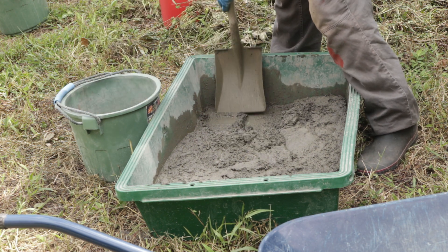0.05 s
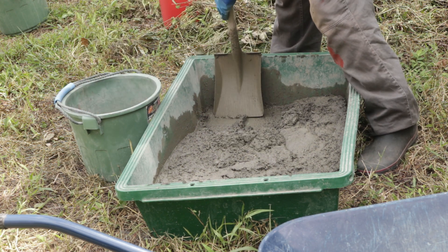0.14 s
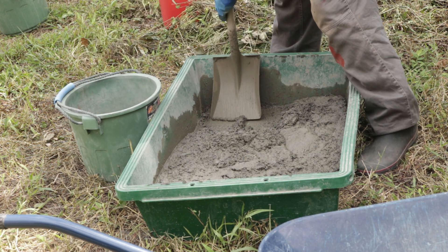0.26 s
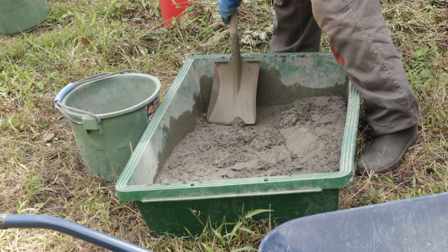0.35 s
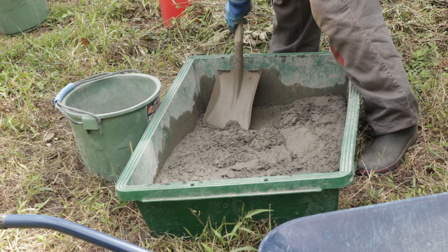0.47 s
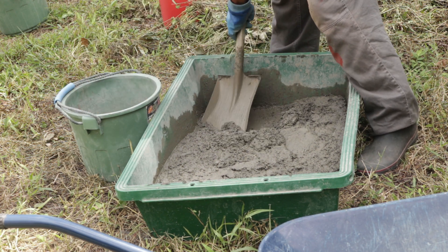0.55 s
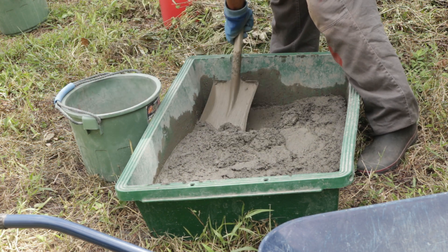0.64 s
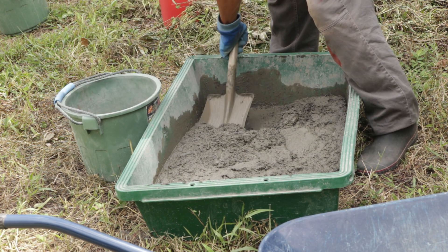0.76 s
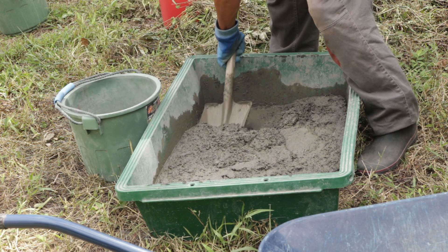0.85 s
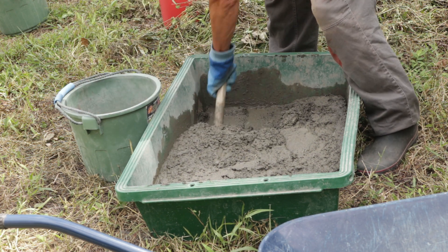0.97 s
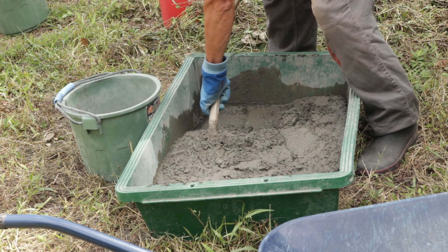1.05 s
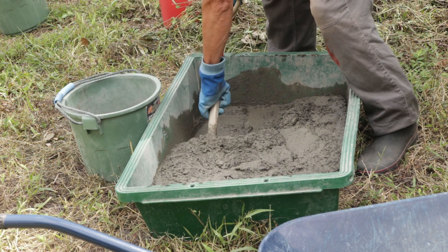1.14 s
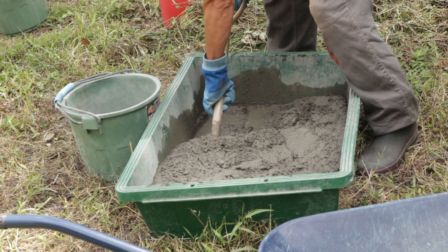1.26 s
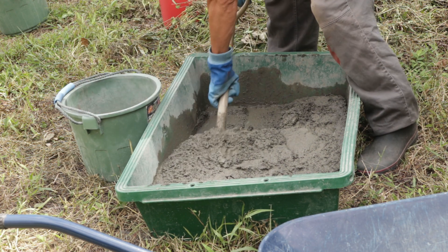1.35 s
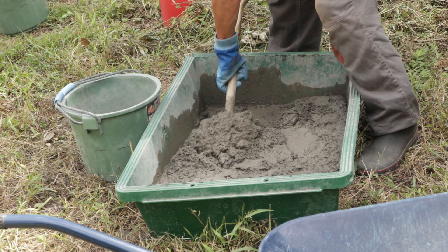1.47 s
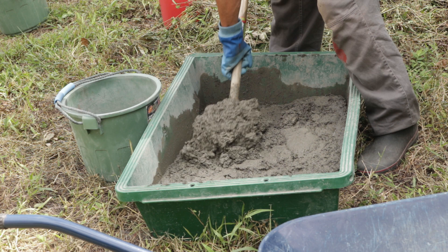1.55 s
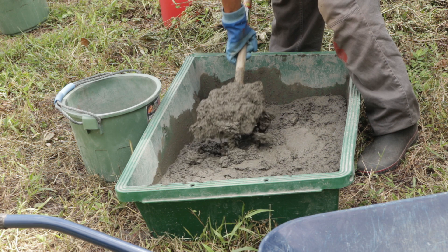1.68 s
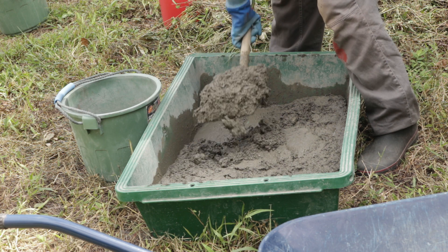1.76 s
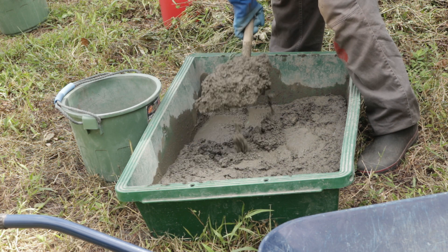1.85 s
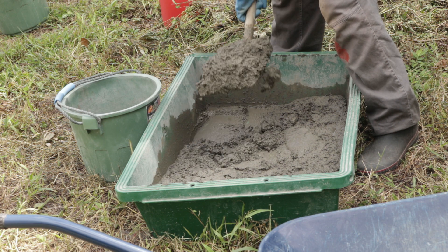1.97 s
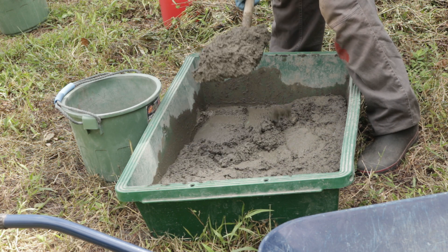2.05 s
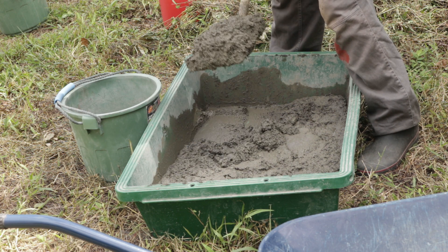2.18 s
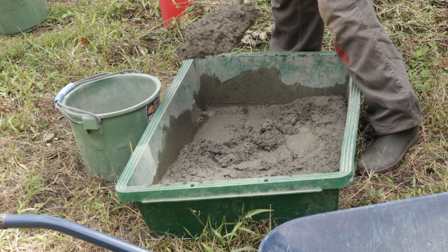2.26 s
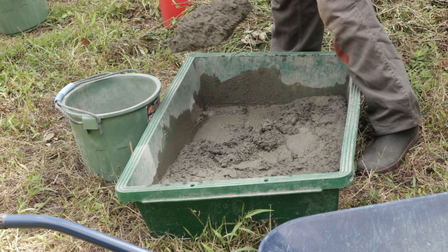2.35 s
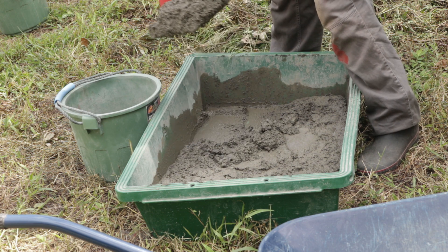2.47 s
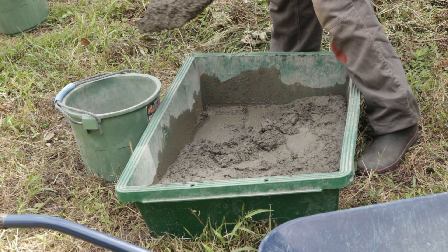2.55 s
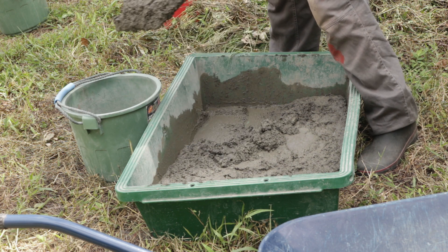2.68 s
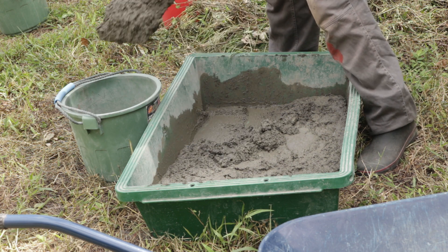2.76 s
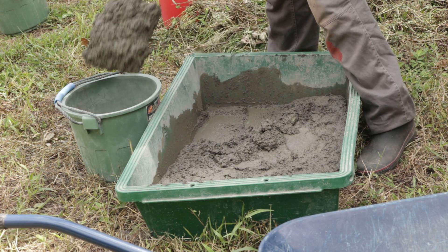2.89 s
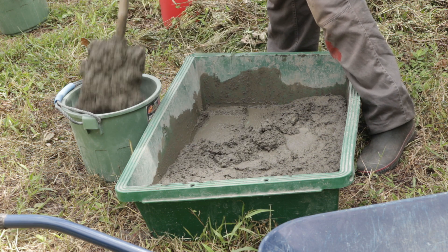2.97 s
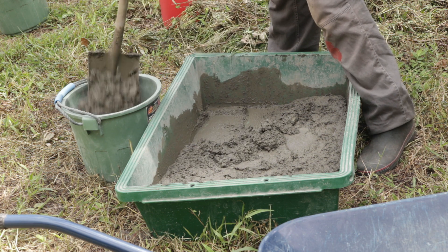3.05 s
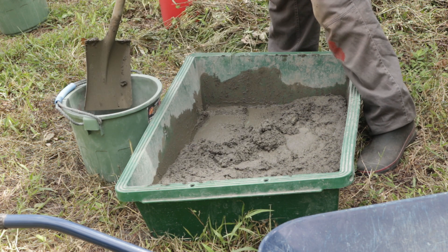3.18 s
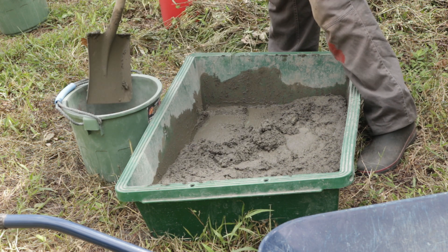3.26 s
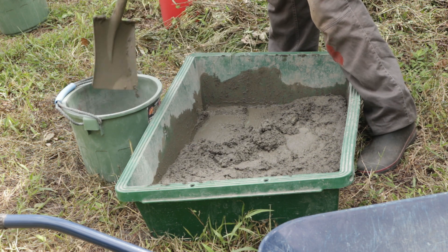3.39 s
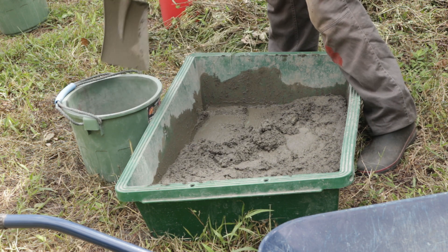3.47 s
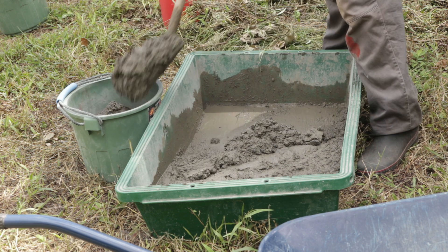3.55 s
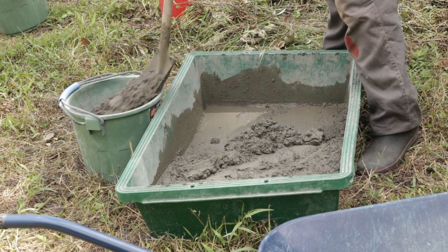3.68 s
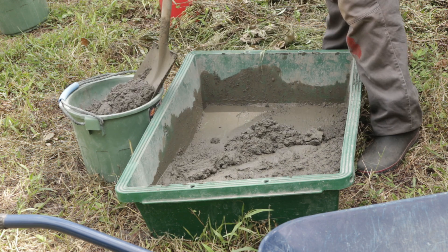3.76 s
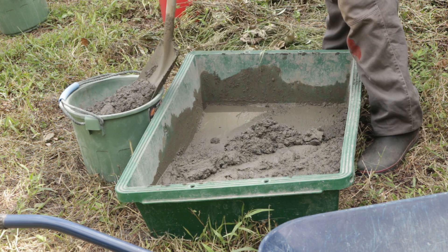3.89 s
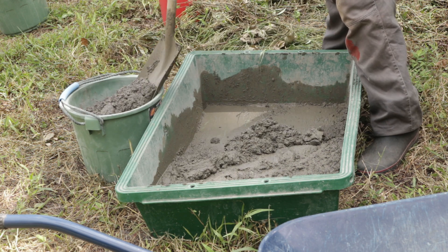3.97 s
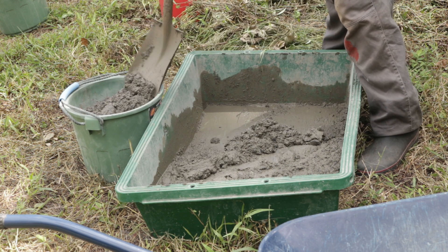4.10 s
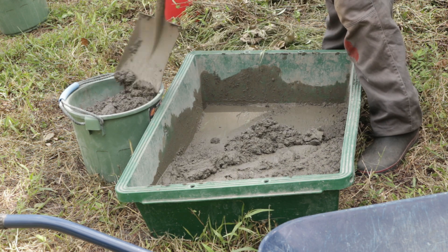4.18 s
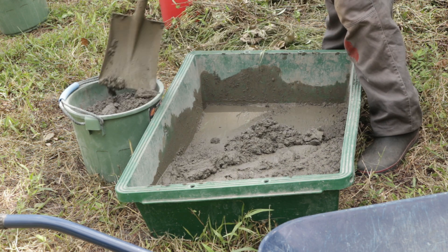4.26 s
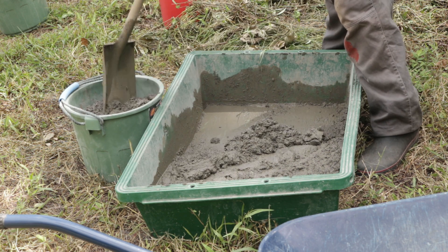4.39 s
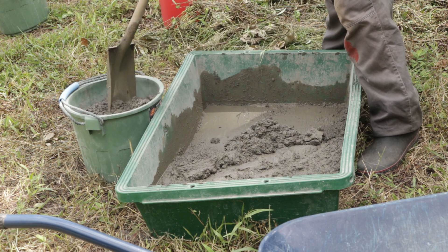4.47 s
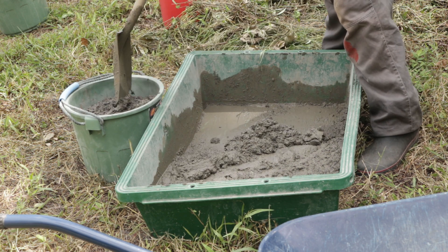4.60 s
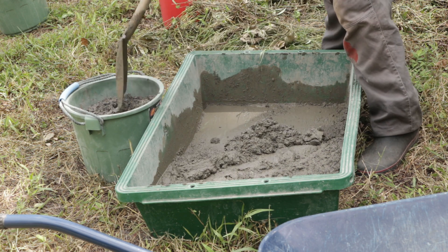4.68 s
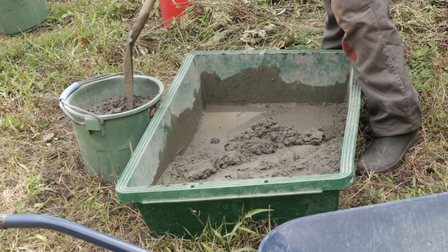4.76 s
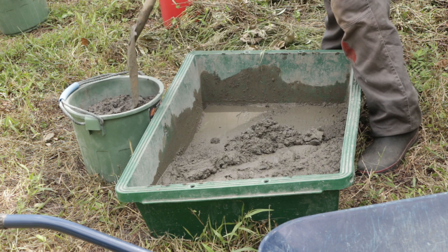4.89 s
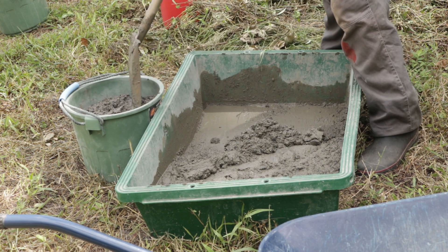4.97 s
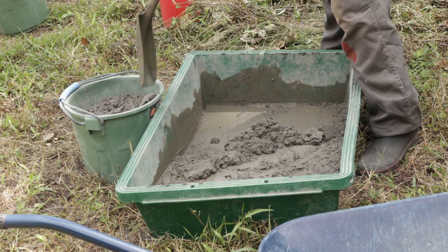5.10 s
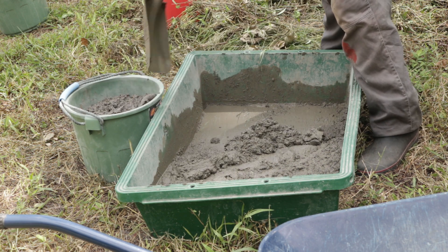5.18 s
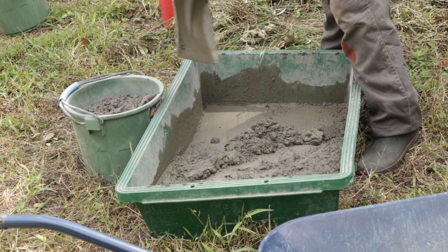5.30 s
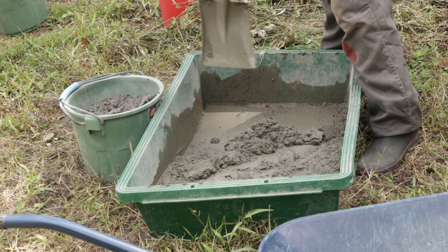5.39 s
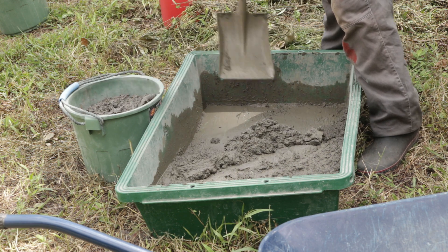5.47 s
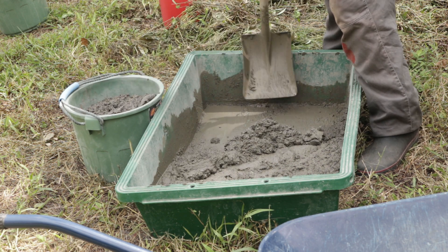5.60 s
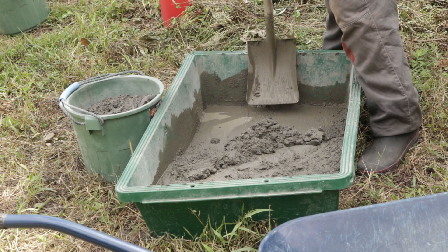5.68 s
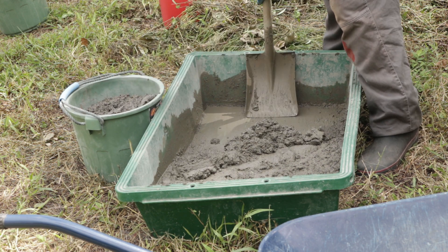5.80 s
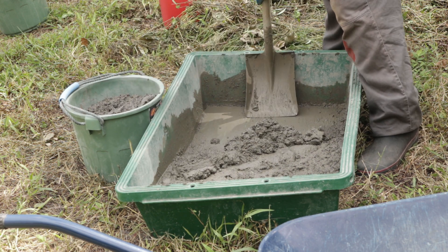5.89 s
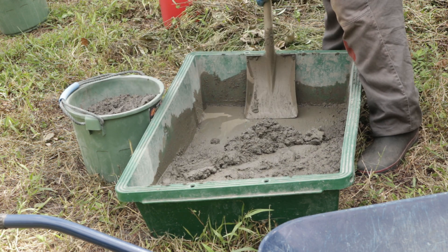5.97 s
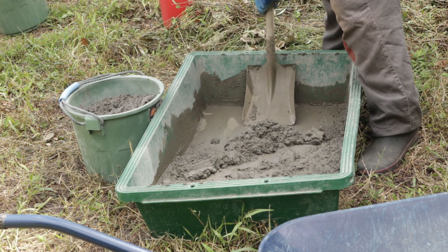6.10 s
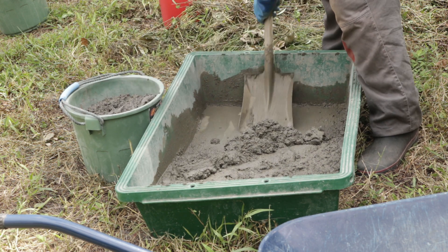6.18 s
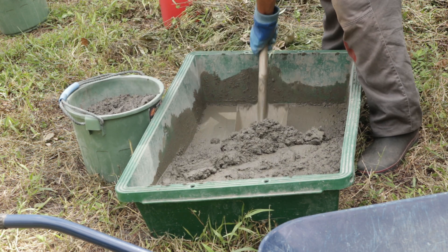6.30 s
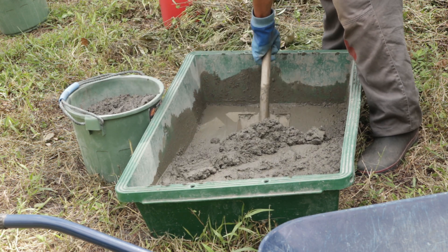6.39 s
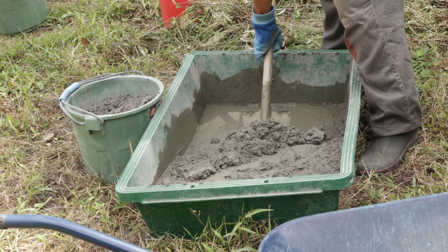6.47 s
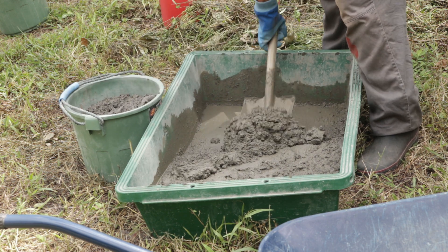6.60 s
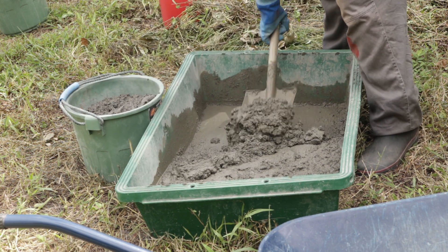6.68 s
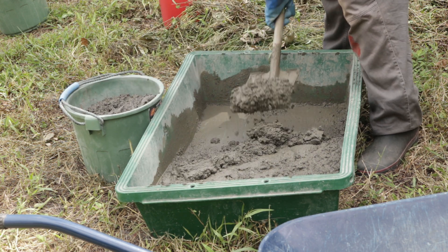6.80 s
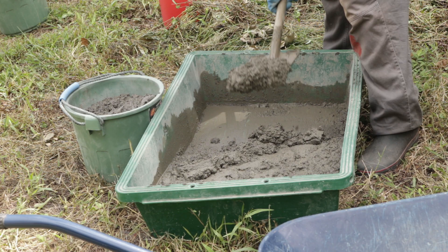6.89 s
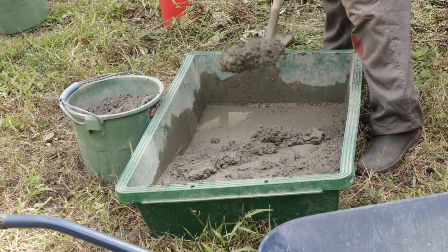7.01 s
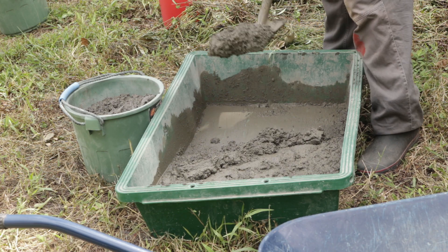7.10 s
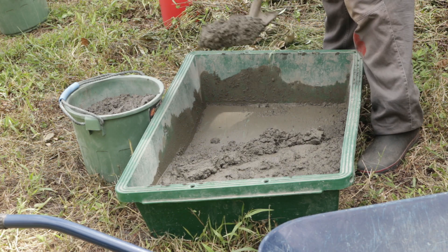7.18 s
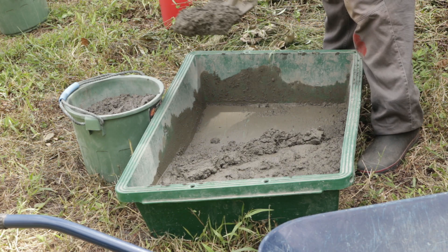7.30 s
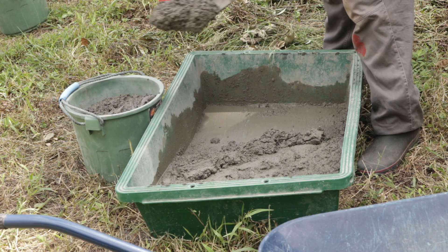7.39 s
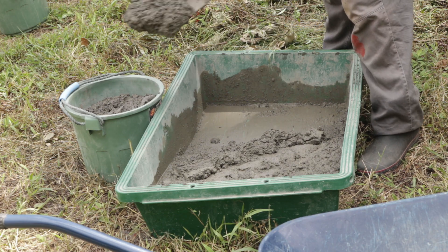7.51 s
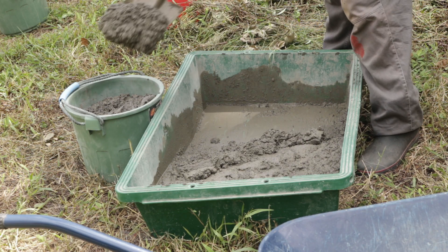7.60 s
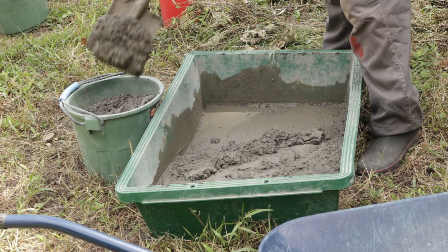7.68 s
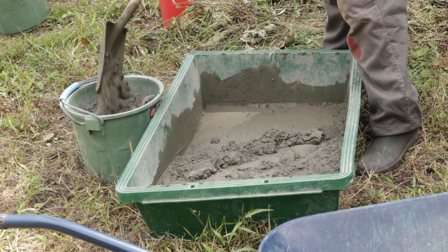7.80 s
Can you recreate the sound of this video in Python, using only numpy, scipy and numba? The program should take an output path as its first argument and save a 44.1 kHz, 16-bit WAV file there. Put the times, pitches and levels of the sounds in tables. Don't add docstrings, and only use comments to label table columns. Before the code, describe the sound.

Close outdoor stereo sound of a steel shovel in a plastic mortar tub: a knock and dry scrape, then a loud wet, gritty thrust with snapping stones. A quiet pause, a soft dump, a sharp hollow slap on a bucket and small pats follow. After another pause the blade clatters into the tub, scrapes the floor and scoops. Cicadas shimmer faintly throughout, with soft wind thumps.

```python
import sys
import numpy as np
from scipy import signal
from scipy.fft import rfft, irfft, next_fast_len
from scipy.io import wavfile
from scipy.ndimage import uniform_filter1d
from numba import njit

SR = 44100
rng = np.random.default_rng(int(sys.argv[2]) if len(sys.argv) > 2 else 0)


def digitize_waveform(pressure):
    field = np.atleast_2d(pressure).T
    bounded = np.clip(field, -1, 1)
    quanta = np.round(bounded * 32767).astype(np.int16)
    wavfile.write(sys.argv[1], SR, quanta)


def ratio_of_db(decibels):
    return 10 ** (np.asarray(decibels, float) / 20)


N = 346185
T = np.arange(N) / SR


def rms1(x):
    return x / np.sqrt(np.mean(x ** 2) + 1e-30)


@njit
def svf(x, hz, width):
    out, band_state, low_state = np.empty(len(x)), 0., 0.
    for i in range(len(x)):
        g = np.tan(np.pi * hz[i] / SR)
        damping = width / hz[i]
        v = (band_state + g * (x[i] - low_state)) / (1 + g * (g + damping))
        band_state = 2 * v - band_state
        low_state += 2 * g * v
        out[i] = damping * v
    return out


def band(x, lo_hz, hi_hz):
    return signal.sosfilt(signal.butter(2, [lo_hz, hi_hz], "bandpass", fs=SR, output="sos"), x)


def colour(x, spectrum):
    hz, db = np.transpose(spectrum)
    size = next_fast_len(len(x))
    f = np.maximum(np.arange(size // 2 + 1) * SR / size, 1)
    gain = ratio_of_db(np.interp(np.log(f), np.log(hz), db))
    return irfft(rfft(x, size) * gain, size)[:len(x)]


def layers(x, centres_hz):
    f = np.log(np.maximum(np.arange(len(x) // 2 + 1) * SR / len(x), 1))
    return [irfft(rfft(x) * np.interp(f, np.log(centres_hz), row), len(x)) for row in np.eye(len(centres_hz))]


def walk(size, rate):
    hold = max(int(SR / rate), 1)
    steps = np.repeat(rng.standard_normal(size // hold + 1), hold)
    return 1.26 * uniform_filter1d(uniform_filter1d(steps, hold), hold)[:size]


def stereo(mid, side):
    return np.array([mid + side, mid - side])


def grind(size, modes, ring_db):
    # frequency in Hz, level in dB per Hz.
    grit_colour = [(59, -25), (100, -7), (238, -3), (447, -3.5), (727, 8.5), (1210, -2), (2130, -0.5),
                   (10400, -27.5), (12300, -33), (15500, -74)]
    jerk_db = 2.87 * np.minimum(rng.exponential(size=size), 6)
    jerk_db += 0.78 * walk(size, 215.7) + 0.59 * walk(size, 56.4)
    slips = rng.standard_normal(size) * ratio_of_db(jerk_db)
    rings = 0
    for k, (hz, width, db) in enumerate(modes):
        catches = slips * ratio_of_db(5.2 * walk(size, 44.5))
        centre = hz * (1 + 0.0056 * walk(size, 21.3))
        ring = rms1(svf(catches, centre, 0.39 * width))
        rings = rings + (-1) ** k * ratio_of_db(db) * np.sqrt(width) * ring
    grain_sizes = layers(colour(slips, grit_colour), 150 * 1.45 ** np.arange(13))
    grit = sum(ratio_of_db(2.6 * walk(size, 110)) * part for part in grain_sizes)
    return ratio_of_db(ring_db) * rms1(rings) + rms1(grit)


def strokes():
    # frequency in Hz, width in Hz, level in dB.
    on_wall = [(497, 46, -5), (673, 41, 10), (1270, 46, -3.5), (1680, 170, -9.5), (2575, 56, -16),
               (2740, 110, -20), (3350, 35, -13)]
    in_mortar = [(328, 63, 13.5), (735, 78, 27), (1700, 110, 5), (2120, 23, 14), (3100, 20, -15),
                 (3680, 270, -21)]
    on_bucket = [(269, 39, -11), (544, 36, 1.5), (1192, 105, 1.5), (1526, 210, 3.5), (2000, 46, -11),
                 (2530, 79, -9)]
    on_floor = [(230, 370, 19), (598, 110, 23), (2000, 50, -22), (2560, 84, -27), (2850, 44, -18)]
    under_heap = [(254, 160, 9), (743, 170, 16.5), (870, 57, -16), (1770, 68, 17), (2370, 28, 0),
                  (3060, 24, -11.5), (3670, 81, 5.5)]
    # time in seconds, pressure in dB, sliding speed as brightness in dB.
    drop_in = [(0.107, -32, -24), (0.112, -25.5, -22.5), (0.134, -30, -11.5), (0.212, -22, -10),
               (0.236, -43, -14), (0.27, -50, -1)]
    down_wall = [(0.293, -36, -2), (0.313, -27.5, -8), (0.413, -25, -8), (0.435, -34, -7),
                 (0.467, -28.5, -8), (0.537, -37.5, -9), (0.608, -26.5, -5), (0.625, -24, -4),
                 (0.663, -41, -4), (0.69, -28, -6)]
    push_in = [(0.69, -31, -7), (0.702, -25.5, -5), (0.72, -21.5, -6.5), (0.882, -24.5, -0.5),
               (0.924, -22.5, -2.5), (0.95, -18, -3)]
    drive_deep = [(0.93, -28, 7), (0.956, -18, 1), (1.07, -14.5, -1), (1.143, -21, -4.5),
                  (1.155, -24, -5.5), (1.215, -23, -9), (1.232, -37, -12), (1.242, -31, -3),
                  (1.256, -48, -10), (1.3, -62, -5)]
    tip_out = [(3.11, -44, 2), (3.143, -33.5, -1.5), (3.166, -37, 2.5), (3.184, -27, -11),
               (3.212, -44, -1.5), (3.29, -46, -8)]
    slap = [(3.725, -21, -17), (3.735, -32.5, -8), (3.76, -40.5, -1), (3.82, -45, 2)]
    pat_down = [(3.875, -45, -8), (3.984, -40.5, -6), (4.04, -43, 3), (4.054, -22, -7), (4.07, -31, -7.5),
                (4.115, -35, -3.5), (4.165, -31.5, -0.5), (4.184, -22.5, -1.5), (4.206, -42, 6),
                (4.288, -34, -11.5), (4.33, -52, -15)]
    land = [(5.745, -16, -10), (5.76, -28, -19.5), (5.781, -28, -17.5), (5.81, -58, -23)]
    bounce = [(5.883, -17, -6.5), (5.893, -28.5, -9.5), (5.91, -42, -7)]
    along_floor = [(6.003, -34, -4), (6.007, -31.5, -14.5), (6.063, -18.5, -13), (6.127, -20.5, -15),
                   (6.181, -24, -11.5), (6.191, -20, -13.5), (6.235, -22.5, -9.5)]
    scoop = [(6.215, -23.5, -11), (6.249, -20, -6), (6.275, -18, -4.5), (6.3, -16, -3.5), (6.318, -17, -2),
             (6.332, -16, -0.5), (6.365, -17.5, -3), (6.4, -16, -2), (6.451, -23, -1), (6.505, -37, -2)]
    # stroke, resonances, ring over plain grit, tub boom, blade body, sand hiss (all in dB).
    moves = [
        (drop_in, on_wall, 4.4, -7.5, -7.5, -8),
        (down_wall, on_wall, -4.5, -6.5, -5.5, -12),
        (push_in, in_mortar, -2.5, -7, -8, -10.5),
        (drive_deep, in_mortar, -2.2, -16.5, -7, -20),
        (tip_out, under_heap, -6, -3.5, -10.5, -7),
        (slap, on_bucket, -5, 1.8, -12, -10),
        (pat_down, on_bucket, 4, -9, -8.5, -21.5),
        (land, on_floor, -4, -6.5, -11, -2.5),
        (bounce, on_wall, 0, 4.2, -13, -5.5),
        (along_floor, on_floor, 1, -7.5, -8.5, -8.5),
        (scoop, under_heap, -6, -7.5, -4.5, -11.5)]
    layer_hz = (200, 700, 2100, 7000)
    speed_slopes = (-0.91, -0.47, 0.91, 1.14)
    grit_db, usual_speed_db = -6, -6
    side_db, rightward = (-21.5, -14.5, -15.5, -8), (0.032, 0.03, 0.17, 0.15)
    out = np.zeros((2, N))
    for stroke, modes, ring_db, boom_db, body_db, hiss_db in moves:
        s, pressure_db, speed_db = np.transpose(stroke)
        levels = [pressure_db + db + slope * (speed_db - usual_speed_db)
                  for db, slope in zip((boom_db, body_db, grit_db, hiss_db), speed_slopes)]
        a, b = int(s[0] * SR), int(s[-1] * SR)
        t = T[a:b]
        direct, spread = (layers(grind(b - a, modes, ring_db), layer_hz) for _ in range(2))
        fade = np.clip(np.minimum(2 * (t - s[0]), s[-1] - t) / .012, 0, 1)
        for mid, side, db, wide_db, right in zip(direct, spread, levels, side_db, rightward):
            mid, side = rms1(mid), rms1(side)
            placed = stereo(mid, ratio_of_db(wide_db) * side - right * mid)
            out[:, a:b] += fade * ratio_of_db(np.interp(t, s, db)) * placed
    return out


def sings():
    # start in seconds, end in seconds, first pitch in Hz, last pitch in Hz, level in dB.
    glides = [(0.108, 0.19, 660, 684, -33), (0.136, 0.16, 1650, 1650, -29.5),
              (0.134, 0.17, 2450, 2480, -32), (0.39, 0.69, 690, 635, -38), (0.738, 0.98, 1060, 1380, -30),
              (0.774, 0.825, 1595, 1700, -24.5), (0.826, 0.912, 1800, 2300, -27.5),
              (.98, 1.17, 867, 610, -19), (0.945, 1.052, 2150, 1660, -32), (3.877, 3.953, 570, 540, -44.5),
              (3.967, 4.044, 532, 520, -36.5), (3.971, 4.03, 1080, 1090, -41), (4.05, 4.316, 560, 670, -39),
              (4.065, 4.306, 270, 287, -42.5), (4.158, 4.217, 2090, 2060, -39), (5.745, 5.81, 80, 85, -22),
              (6.002, 6.133, 787, 715, -29), (6.38, 6.47, 1950, 1850, -28.5),
              (6.29, 6.36, 650, 1020, -22.5), (.75, 0.94, 1034, 1150, -30.5),
              (0.081, 0.216, 110, 72, -30.5), (3.722, 3.755, 150, 130, -22.5),
              (.33, 0.448, 2560, 2540, -40)]
    out = np.zeros(N)
    for start, end, from_hz, to_hz, db in glides:
        width = 28 + 0.36 * abs(to_hz - from_hz)
        a, b = int(start * SR), int(end * SR)
        t = T[a:b]
        jolts = rng.standard_normal(b - a) * ratio_of_db(3.5 * walk(b - a, 90.0))
        centre = np.linspace(from_hz, to_hz, b - a)
        ring = rms1(svf(svf(jolts, centre, 1.5 * width), centre, 1.5 * width))
        fade = np.minimum((t - start) / .004, (end - t) / (end - start) / .3)
        out[a:b] += ratio_of_db(db) * ring * np.clip(fade, 0, 1)
    return stereo(out, -.12 * out)


def knocks():
    # time in seconds, ring peak in dB, ring in Hz, thud in Hz, thud minus ring in dB.
    heavy = [
        (0.1081, -11.5, 553, 95, 0.5),
        (0.313, -24.5, 810, 139, 8.5),
        (0.403, -19, 443, 315, 7.5),
        (3.177, -20, 520, 230, 4),
        (3.719, 1, 470, 295, -4),
        (5.74, -9, 435, 148, 1),
        (5.8809, -17.5, 786, 215, 7),
        (6.064, -5, 520, 249, -14),
    ]
    # time in seconds, ring peak in dB, ring in Hz, crack minus ring in dB.
    light = [(0.204, -5, 815, -5), (0.2025, -3.5, 493, -12), (0.298, -19.5, 960, 0),
             (0.615, -7.5, 633, -25), (0.701, -32, 625, 0), (0.963, -16, 765, 8), (1.028, -9, 735, 0),
             (1.085, -6.5, 696, -10), (1.237, -17, 678, -13), (3.7172, -3.5, 940, -9.5),
             (3.177, -29, 276, -12), (3.765, -37, 466, 14.5), (3.898, -29, 560, -8), (3.968, -22, 543, -16),
             (4.053, -15.5, 544, -8), (4.081, -28, 553, 2), (4.121, -18, 585, -8), (4.169, -33, 650, -11.5),
             (6.009, -19, 760, -6), (5.887, -8, 790, -9.5), (6.11, -14, 606, -12), (6.09, -15, 400, -17)]
    hits = [(*blow, -22) for blow in heavy]
    hits += [(s, db, hz, hz / 3.9, -27, crack_db) for s, db, hz, crack_db in light]
    out, t = np.zeros(N + SR), T[:SR // 4]
    push = 1 - np.exp(-t / 0.00066)
    chance = rng.standard_normal((len(hits), len(t)))
    for (s, db, ring_hz, thud_hz, thud_db, crack_db), noise in zip(hits, chance):
        pair = np.sin(2 * np.pi * ring_hz * t) + 0.12 * np.sin(2 * np.pi * 0.99 * ring_hz * t)
        ring = pair * np.exp(-t / 0.0058)
        thud = np.sin(2 * np.pi * thud_hz * t) * np.exp(-t * thud_hz / 1.57)
        contact = (noise + 6 * (t == 0)) * np.exp(-t / .002)
        crack = band(band(contact, 800, 3300), 500, 4000)
        rattle = band(noise * np.exp(-t / 0.0039), 153, 940)
        blow = push * (0.5 * ring + ratio_of_db(thud_db) * thud + ratio_of_db(-3.5) * rattle / np.abs(rattle).max())
        i = int(s * SR)
        out[i:i + len(t)] += ratio_of_db(db) * (blow + ratio_of_db(crack_db) * crack / np.abs(crack).max())
    return stereo(out[:N], -.08 * out[:N])


def stones():
    # time in seconds, peak in dB, pitch of the snap in Hz.
    crushed = [(.113, -28, 1600), (0.199, -10.5, 2700), (.283, -28, 894), (.298, -35, 1200),
               (.565, -25, 630), (0.604, -16, 1270), (.615, -14, 2000), (.696, -29, 1340),
               (0.702, -13, 2000), (0.755, -16, 990), (.782, -10, 1620), (.805, -11, 1610),
               (.867, -9, 1950), (.886, -8, 1600), (.936, -18, 2400), (.963, -2, 2060), (1.03, -5, 1740),
               (1.066, -7, 2220), (1.163, -15, 2960), (1.24, -16.5, 2100), (3.7178, -7.5, 2000),
               (3.877, -37, 900), (3.897, -30, 1600), (3.969, -27, 1100), (4.053, -30, 1450),
               (4.085, -24, 1300), (4.12, -22, 1500), (4.14, -26, 1300), (4.155, -26, 650),
               (4.22, -30, 1500), (4.275, -40, 506), (4.178, -16, 1550), (4.255, -34, 1200),
               (4.29, -28, 780), (6.064, -24, 1200), (6.1, -19, 2000), (6.33, -13, 2000), (6.39, -17, 1900),
               (6.213, -22, 673), (6.257, -8.5, 1480), (.8475, -18, 1300), (6.349, -10, 1500),
               (6.298, -14, 1800), (6.497, -28, 1500)]
    out, t = np.zeros(N + SR), T[:SR // 30]
    for (s, db, hz), noise in zip(crushed, rng.standard_normal((len(crushed), len(t)))):
        centre = hz + 0 * t
        burst = (noise + 5 * (t == 0)) * np.exp(-t / 0.0018)
        snap = svf(svf(burst, centre, 0.17 * hz), centre, 1. * hz)
        i = int(s * SR)
        out[i:i + len(t)] += ratio_of_db(db) * snap / np.abs(snap).max()
    return stereo(out[:N], -.15 * out[:N])


def rustles():
    # centre in seconds, length in seconds, level in dB.
    brushes = [(2.21, 0.0096, -49.5), (2.62, .04, -65), (3.032, 0.11, -57), (3.672, 0.082, -50.5),
               (4.48, 0.075, -51.5), (5.287, 0.04, -61), (1.323, 0.025, -64), (1.6, 0.27, -63.5),
               (4.648, 0.042, -60), (6.746, 0.15, -62), (7.84, 0.031, -55)]
    swell = sum(ratio_of_db(db) * np.exp(-((T - s) / length) ** 2) for s, length, db in brushes)
    mid, side = (rms1(band(rng.standard_normal(N) * ratio_of_db(1.8 * walk(N, 88)), 4700, 10700)) for _ in range(2))
    return swell * stereo(mid, 0.53 * side)


def cicada(calls, creep_s, bend, multiple, body, trim_db, side):
    out = np.zeros(N)
    for swell, held, rate, creep_db, held_db in calls:
        start, end = swell - creep_s, swell + held
        a, b = int(start * SR), min(int(end * SR), N)
        t, size = T[a:b], b - a
        phase = np.cumsum(rate * (1 + .0013 * walk(size, 10) + .025 * (t - swell - held / 2))) / SR
        clicks = sum(np.cos(2 * np.pi * k * phase) for k in range(6, 40))
        turn, scatter = rng.standard_normal((2, 40))
        buzz = 0
        for k in range(17, 33):
            lift = .07 + sum(ratio_of_db(d) / (1 + ((k * rate - f) / w) ** 4) for f, w, d in body)
            flutter = ratio_of_db(1.5 * scatter[k] + 1.6 * walk(size, 14))
            buzz = buzz + lift * flutter * np.cos(2 * np.pi * k * phase + 3 * turn[k])
        rise = np.clip((t - start) / (swell - start), 0, 1)
        leap = 1 / (1 + np.exp((swell - .05 - t) / .017))
        belly_hz = 1500 + 520 * rise ** bend + (multiple * rate - 2020) * leap
        whistle = (1 + 1.5 * leap) * (1 - leap) ** 1.3 * np.sin(2 * np.pi * np.cumsum(belly_hz) / SR)
        creep = rms1(svf(svf(clicks, belly_hz, 330.), belly_hz, 330.))
        voice = (.3 + 2 * leap) * (1 - leap ** 3) * creep + whistle + 1.2 * leap ** 14 * rms1(buzz)
        db = creep_db + 1 - 2 * (1 - rise) + (held_db - creep_db - 1) * leap + 1.6 * walk(size, 30)
        fade = np.clip(np.minimum(t - start, end - t) / .02, 0, 1)
        out[a:b] += ratio_of_db(db + trim_db + .4 * walk(size, 6)) * fade * voice
    tail = rng.standard_normal((2, SR // 8)) * np.exp(-T[:SR // 8] / 0.0035)
    wet = np.array([signal.fftconvolve(out, rms1(r) / np.sqrt(SR / 8))[:N] for r in tail])
    return stereo(out, side * out) + ratio_of_db(-11) * wet


def near_cicada():
    # belly swells in seconds, held in seconds, clicks per second, creeping in dB, held in dB.
    near_calls = [(3.74, .22, 165.4, -70, -54), (4.31, .22, 167.5, -59, -43), (4.87, .2, 168.9, -51, -43),
                  (5.42, .21, 169.7, -64, -44.5), (5.96, .2, 170.9, -55, -54), (6.52, .2, 172.1, -62, -54),
                  (7.08, .2, 173.7, -66, -46), (7.6, .19, 174.2, -66, -49)]
    # frequency in Hz, width in Hz, level in dB.
    near_belly = [(4545, 90, 0), (4865, 90, -8), (3865, 90, -9), (3385, 110, -13)]
    return cicada(near_calls, creep_s=.19, bend=.75, multiple=27, body=near_belly, trim_db=3, side=.15)


def far_cicada():
    # belly swells in seconds, held in seconds, clicks per second, creeping in dB, held in dB.
    far_calls = [(2.605, .3, 166, -53, -59), (3.45, .25, 171, -66, -53), (4.02, .18, 172, -64, -52),
                 (4.58, .24, 172, -64, -54), (5.09, .06, 164, -53, -49), (6.9, .06, 172, -58, -58),
                 (7.095, .3, 172.5, -55, -51), (7.785, .12, 170, -53, -54)]
    # frequency in Hz, width in Hz, level in dB.
    far_belly = [(4980, 100, 0), (4330, 120, -5), (3760, 110, -4), (3200, 120, -7)]
    return cicada(far_calls, creep_s=.235, bend=1.3, multiple=29, body=far_belly, trim_db=1.5, side=-.6)


def notes():
    # start in seconds, end in seconds, pitch in Hz, level in dB.
    held_notes = [(1.38, 1.52, 4064, -63), (1.55, 1.8, 3500, -65), (2.08, 2.24, 4139, -59),
                  (2.8, 2.95, 3596, -61), (2.95, 3.1, 3954, -61), (2.41, 2.52, 1900, -55),
                  (2.67, 2.77, 4760, -56), (3.74, 3.95, 4463, -51), (5.48, 5.62, 3563, -54),
                  (6.55, 6.72, 4648, -49), (6.58, 6.8, 3612, -56), (6.56, 6.7, 3270, -55),
                  (7.1, 7.27, 4212, -54), (7.12, 7.27, 4680, -52), (7.58, 7.75, 4705, -52),
                  (3.38, 3.64, 3780, -57), (3.675, 3.735, 4050, -47), (3.9, 4.05, 3297, -56),
                  (4.05, 4.2, 4826, -56), (4.26, 4.335, 4069, -49), (4.5, 4.8, 3682, -54),
                  (4.52, 4.72, 2680, -59), (4.7, 4.83, 4820, -55), (4.83, 4.89, 4096, -48),
                  (4.84, 4.875, 3582, -50), (5.05, 5.3, 3372, -60), (5.29, 5.45, 4871, -49),
                  (5.33, 5.43, 3945, -51), (5.3, 5.4, 4363, -55), (5.6, 5.8, 3727, -57),
                  (5.97, 6.16, 4788, -46), (6.72, 6.95, 3431, -60), (6.98, 7.1, 4347, -50),
                  (7.0, 7.1, 3997, -52), (7.25, 7.45, 3631, -55), (7.27, 7.53, 2765, -56),
                  (7.55, 7.72, 3660, -52), (7.55, 7.7, 4355, -52), (7.7, 7.83, 4863, -53),
                  (2.34, 2.41, 1620, -58), (2.55, 2.6, 3300, -55), (3.74, 3.94, 4630, -54),
                  (3.78, 3.92, 4296, -55), (3.81, 3.94, 5136, -57), (7.26, 7.4, 5001, -49),
                  (7.1, 7.35, 3801, -56), (7.15, 7.32, 3445, -58), (7.1, 7.3, 3106, -59),
                  (7.66, 7.75, 4190, -53), (6.5, 6.7, 3960, -56)]
    out = np.zeros((2, N))
    for (start, end, hz, db), chance in zip(held_notes, rng.standard_normal((len(held_notes), 6))):
        a, b = int(start * SR), int(end * SR)
        drift = np.cumsum(1 + .0012 * walk(b - a, 12)) / SR
        line = 0
        for k, c in zip(range(-2, 3), chance):
            level = ratio_of_db((k != 0) * (-11 + 3 * c))
            line = line + level * np.sin(2 * np.pi * (hz + k * 168) * drift + 3 * c)
        line *= np.sqrt(2) * ratio_of_db(db + 2 * walk(b - a, 25)) * signal.windows.tukey(b - a, .4)
        out[:, a:b] += stereo(line, .5 * chance[5] * np.roll(line, 3))
    return out


def crowd(count):
    # time in seconds, level in dB.
    crowd_level = [(0, -46), (1.3, -53), (3.2, -48), (4.3, -42.5), (6.5, -41), (7.85, -40.5)]
    out = 0
    for rate, place in zip(np.linspace(158, 186, count), rng.uniform(-1, 1, count)):
        cycles = np.cumsum(rate * (1 + .006 * walk(N, 3))) / SR
        clicks = np.diff(np.floor(cycles), prepend=0)
        peaks = zip(np.linspace(3100, 5300, 12), 4 * rng.standard_normal(12))
        body = [(2600, -40), *peaks, (6100, -40)]
        ring = rng.standard_normal(SR // 300) * np.hanning(SR // 300)
        song = rms1(colour(signal.oaconvolve(clicks, ring)[:N], body))
        song = song * np.clip(walk(N, 6) - .15, .04, 1)
        out = out + 1.5 * np.array([ratio_of_db(2 * place) * song, np.roll(song, 3)])
    return ratio_of_db(np.interp(T, *np.transpose(crowd_level))) * out / np.sqrt(2 * count)


def field():
    # frequency in Hz, level in dB per Hz.
    mid_colour = [(35, -6), (60, -1), (145, -4.5), (242, -8), (533, -10), (976, -14.5), (2000, -15.5),
                  (2910, -10), (4520, -5.5), (6500, -15.5), (7200, -24.5), (9000, -38), (13300, -27.5),
                  (15500, -34)]
    side_colour = [(35, -55), (60, -29), (216, -17.5), (1130, -22.5), (1290, -23.5), (2010, -26),
                   (2210, -33), (2920, -30.5), (3360, -25.5), (4870, -19), (6600, -30), (8930, -32.5),
                   (12400, -30), (15600, -35)]
    # time in seconds,
    # level in dB.
    chorus_level = [(0, -37), (.7, -37.5), (1.25, -43.5), (1.7, -44.5), (2.0, -38), (2.3, -40.5),
                    (2.7, -39.5), (3.2, -40.5), (3.6, -38), (4.1, -37), (4.6, -37), (5.3, -38.5),
                    (6, -35.5), (6.55, -35), (6.85, -37), (7.15, -36), (7.4, -41), (7.85, -34.5)]
    air_level = [(0, -55), (1.3, -61.5), (2.5, -58), (4.6, -55.5), (5.3, -55.5), (7.85, -56)]
    s, chorus_db = np.transpose(chorus_level)
    hum_db = -49.5 + 0.34 * (chorus_db + 40)
    air_db = np.interp(T, *np.transpose(air_level))
    split_hz = (1800, 2800, 3600, 4500, 5700, 7000, 8500, 12000)
    out = 0
    for spectrum, sign, chorus_trim_db, hum_trim_db, air_trim_db in (
            (mid_colour, 1, -4.5, 1.5, -4), (side_colour, -1, .6, -8, 3)):
        hum, *chorus, low_air, high_air = layers(colour(rng.standard_normal(N), spectrum), split_hz)
        flicker = sum(ratio_of_db(1.3 * walk(N, 9)) * part for part in chorus)
        air = ratio_of_db(-1.5 + 2 * walk(N, 9)) * low_air + ratio_of_db(-.5 + 1.6 * walk(N, 9)) * high_air
        layer = ratio_of_db(chorus_trim_db + np.interp(T, s, chorus_db)) * rms1(flicker)
        layer += ratio_of_db(hum_trim_db + np.interp(T, s, hum_db) + 0.047 * walk(N, 4.6)) * rms1(hum)
        layer += ratio_of_db(air_db + air_trim_db) * rms1(air)
        out = out + np.outer([1, sign], layer)
    return out


def breeze():
    # centre in seconds, length in seconds, level in dB.
    gusts = [(.04, .1, -49), (0.38, 0.18, -42.5), (1.88, .05, -58), (2.05, 0.031, -57), (2.3, 0.18, -56),
             (2.866, 0.043, -48), (2.993, 0.093, -36.5), (3.18, 0.036, -35), (3.336, 0.068, -39.5),
             (3.488, 0.043, -43.5), (3.692, 0.06, -34.5), (3.9, 0.19, -52), (4.392, 0.027, -41),
             (4.62, 0.12, -61), (4.975, 0.056, -41), (5.37, 0.073, -53), (5.582, 0.066, -46),
             (6.938, 0.069, -53), (7.22, 0.049, -55), (7.4, .12, -58), (7.7, .1, -58)]
    calm = ratio_of_db(-63)
    swell = calm + sum(ratio_of_db(db) * np.exp(-((T - s) / length) ** 2) for s, length, db in gusts)
    eddies = band(band(rng.standard_normal(N) * ratio_of_db(1.0 * walk(N, 6.8)), 36, 86.0), 34, 122)
    side = band(rng.standard_normal(N), 25, 190)
    return swell * stereo(rms1(eddies), 0.18 * rms1(side))


def scene():
    shovel = strokes() + sings() + knocks() + stones()
    cicadas = near_cicada() + far_cicada() + notes() + crowd(count=6)
    return shovel + rustles() + cicadas + field() + breeze()


def band_limit(x):
    return signal.sosfilt(signal.butter(12, 15750, fs=SR, output="sos"), x)


def record(dry):
    mix = np.tanh(0.8 * dry)
    return band_limit(mix)


dry = scene()
out = record(dry)
digitize_waveform(out)
```